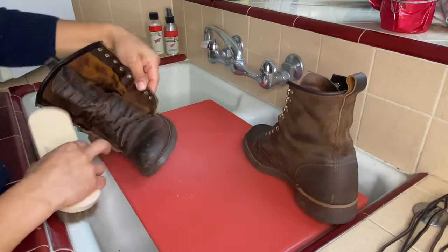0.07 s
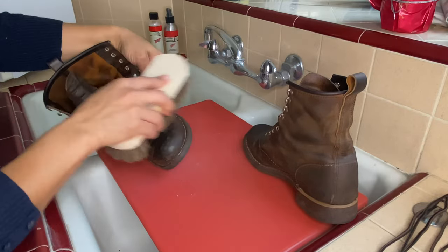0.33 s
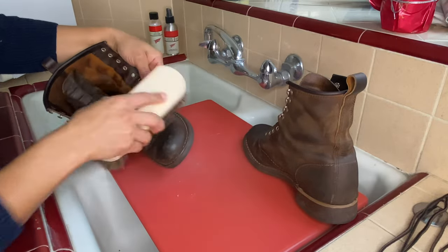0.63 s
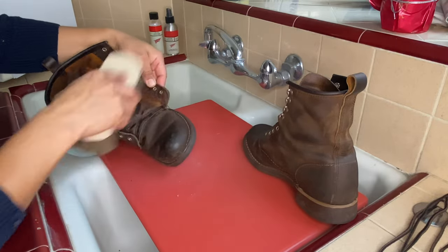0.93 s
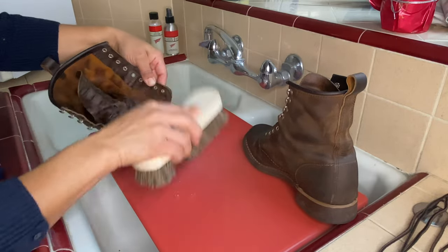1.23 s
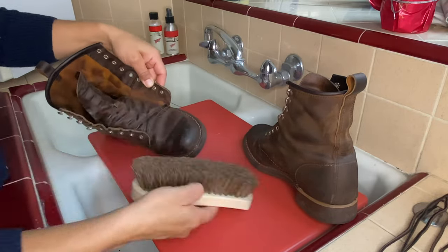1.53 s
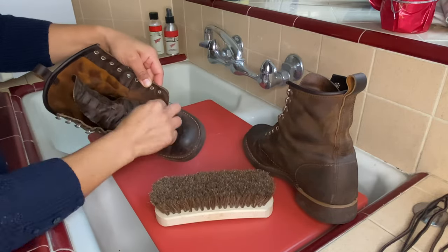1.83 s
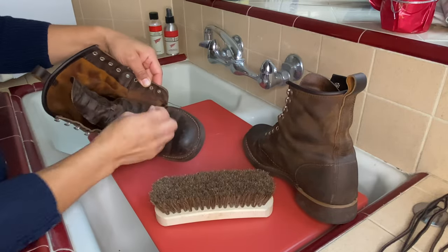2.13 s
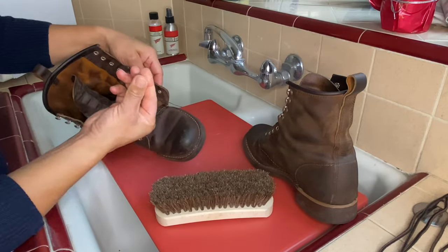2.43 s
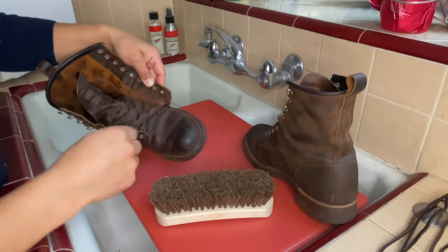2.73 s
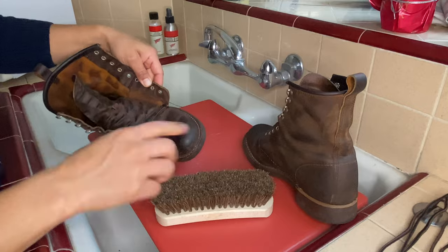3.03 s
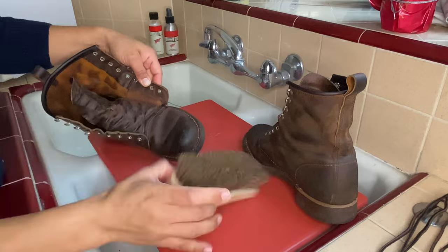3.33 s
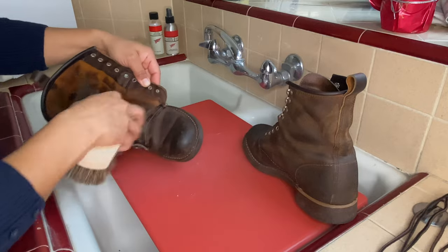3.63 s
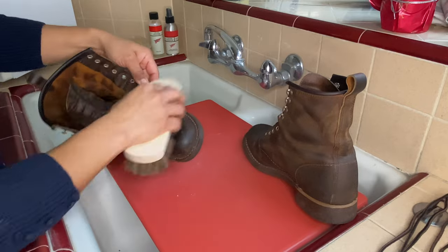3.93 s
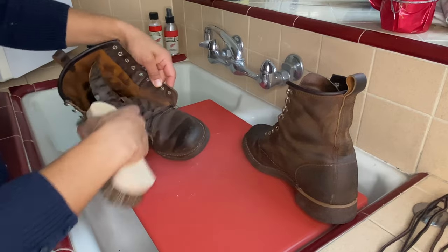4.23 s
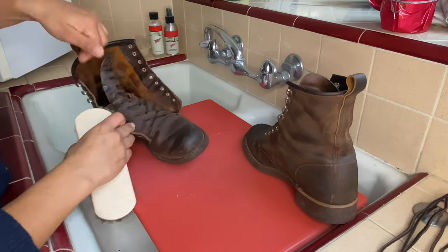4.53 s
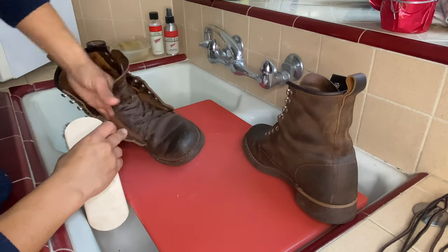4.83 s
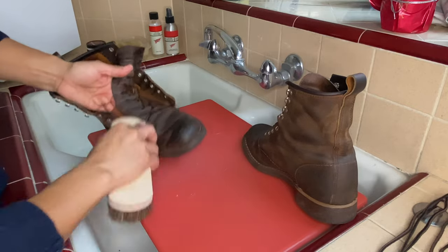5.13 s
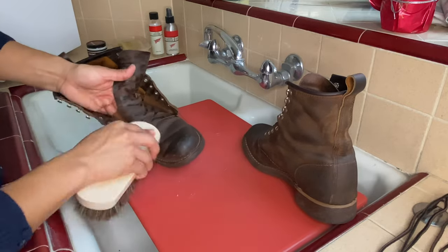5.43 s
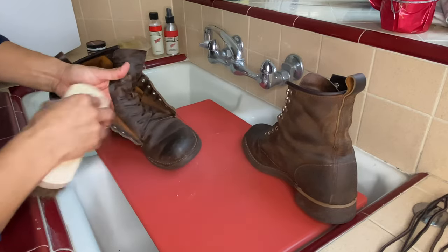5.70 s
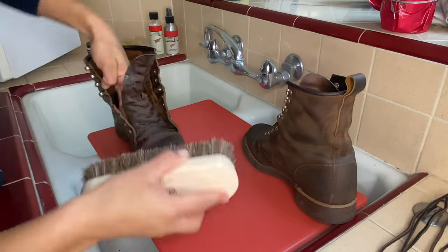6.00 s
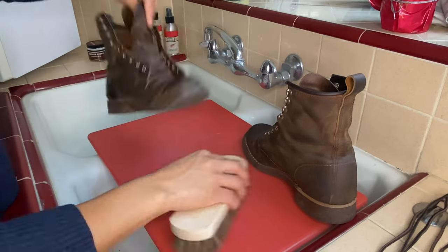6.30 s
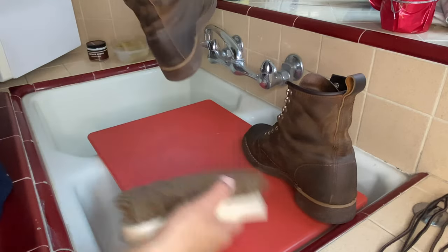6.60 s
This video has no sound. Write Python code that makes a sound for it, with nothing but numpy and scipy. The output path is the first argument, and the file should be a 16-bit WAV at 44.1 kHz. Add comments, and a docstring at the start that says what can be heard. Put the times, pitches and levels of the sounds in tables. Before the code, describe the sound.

A stiff brush sweeps a leather boot in quick, scratchy strokes, with soft hollow thumps from the boot. The wooden brush clatters onto a plastic board, and a quiet pause holds only faint leather rustling. The brush is dragged up with a short judder, and a second, less even run follows with dull knocks, ending in another wooden clatter. It sounds close, in a small tiled room with a low hum.

```python
"""A tiled room, a leather boot lying on a plastic board across a sink. A horsehair brush sweeps the boot in
quick strokes: hairs hiss, tufts rub, the hollow boot thumps; the rocking sole or a light brush tap knocks
on the board. The wooden brush is put down, dragged up in a stick-slip judder for a second run, and dropped
at the end. Leather rustles in the holding hand. The room hums, with a faint high whine."""
import sys
import numpy as np
from scipy import signal
from scipy.fft import rfft, irfft, next_fast_len
from scipy.io import wavfile

SR = 44100
rng = np.random.default_rng(int(sys.argv[2]) if len(sys.argv) > 2 else 0)


def store_pcm(level_fs):
    """Save levels as 16-bit WAV."""
    pcm = np.round(np.clip(level_fs, -1, 1) * 32767).astype(np.int16)
    wavfile.write(sys.argv[1], SR, np.atleast_2d(pcm).T)


N = 298116
TIME_S = np.arange(N) / SR
MAX_RING_T60_S = 0.21
DULL_SLOPES = [0, 0.7, 1.05, 1.3]   # thud, knock, clack, tick [dB per dB of hardness]

# brush strokes on the leather: (time [s], length [s], rise [s], level [dB])
STROKES = [(.203, .052, 0.019, -50), (.382, .15, .035, -56), (.677, 0.06, 0.0046, -49.5),
           (.834, 0.046, 0.0045, -48), (.999, 0.059, 0.018, -51), (1.173, 0.039, 0.0066, -50),
           (1.315, 0.066, 0.0036, -51), (3.573, 0.098, 0.025, -56), (3.774, .071, .01, -52.5),
           (3.944, 0.095, 0.023, -51), (4.235, 0.023, .004, -60), (4.317, 0.072, 0.0018, -68),
           (5.106, 0.049, .004, -56), (5.191, 0.021, 0.012, -47), (5.352, 0.18, 0.0039, -61),
           (5.616, 0.064, 0.0057, -56), (5.816, .055, 0.0055, -56), (5.941, 0.026, 0.0079, -57)]
# dull knocks on board and sink, from the rocking sole or light brush taps:
# (time [s], strength [dB], hardness [dB])
BOARD_KNOCKS = [(0.35, -41, -7.5), (1.621, -22, -21.5), (4.322, -58, 2), (4.49, -41.5, 3.5),
                (4.674, -48, -0.5), (4.918, -49, 4), (4.988, -52.5, -4), (5.179, -31, 10), (5.21, -26, -9),
                (5.225, -34.5, 6.5), (5.351, -33.5, 3.5), (5.421, -32.5, 3.5), (5.954, -34.5, 8),
                (5.989, -32, -31), (6.334, -42, -13.5)]
# hollow boot: (frequency [Hz], gain [dB], uncapped t60 [s])
BOOT_MODES = [(245.6, 5, .18), (293.8, 0, 0.13), (367, -2.5, 0.17), (493, -2, 0.12), (558, -7.5, 0.24),
              (658, -4.5, 0.059), (875, -4.5, .1), (1024, -1.5, 0.07), (1146, -4, 0.1), (1810, -3, 0.079),
              (2138, -6.5, .06), (2177, -6, 0.094)]
# wooden brush back on the board: (frequency [Hz], gain [dB], uncapped t60 [s])
WOOD_MODES = [(258, 7.5, 0.1), (321, 5.5, 0.12), (375.2, 5.5, 0.48), (516.2, 7.5, 0.15), (575.3, 7.5, 0.12),
              (644, 0.5, 0.085), (689, -5.5, .2), (953, -8.5, 0.19), (1018, -1, .06), (1330, -3, .08),
              (1497, 0, 0.065), (1723, -8.5, 0.091), (2172, -7, 0.18), (2432, -1.5, 0.12),
              (2550, -7, 0.087), (3064, -7, 0.12), (1150, -9, 0.028), (2520, -4.5, 0.097),
              (4310, -1.5, 0.088), (5370, -1.5, 0.059), (6370, -3.5, 0.055)]
# leather moving in the holding hand: (time [s], level [dB])
HANDLING = [(0, -69), (1.5, -84.5), (1.9, -64.5), (2.3, -84.5), (3.1, -83.5), (3.45, -72), (3.8, -85),
            (4.5, -60.5), (5.1, -59.5), (6.05, -59), (6.76, -69)]
# left-right likeness: (frequency [Hz], unclipped coherence [ratio])
COHERENCE = [(60, 0.8), (250, 1.27), (550, 0.62), (1200, 0.49), (3000, 0.03), (12000, 0.1)]


def bristles(flick_db=0.5, tuft_db=2.5, hiss_db=3.5, rub_db=-5.0, boot_db=-3.5):
    """Single hairs flick (hiss); whole tufts catch on the leather (rub) and keep the boot ringing."""
    # hair and tuft spectra: (frequency [Hz], density [dB])
    hiss_spectrum = [(200, -1.5), (700, 0), (1500, -3), (3000, 1.5), (4500, 4), (7000, -1), (10000, 1),
                     (12000, -4), (15000, -5.5)]
    rub_spectrum = [(150, -28.5), (250, 10.5), (400, -0.5), (700, -2.5), (1100, 3.5), (1600, -3.5),
                    (2300, -9), (3200, -10), (5000, -20), (9000, -37.5)]
    # rub resonances: (frequency [Hz], width [Hz], gain [dB])
    rub_peaks = [(263, 16, -2.5), (1030, 130, 7), (1160, 17, 9.5), (1310, 27, -0.5), (1536, 60, 1.5),
                 (1710, 78, 1), (2034, 90, -1.5), (2380, 68, 4)]
    hiss_env, rub_env = friction_envelopes()
    tufts = from_db(tuft_db * flutter(rate_hz=59))
    hairs = stereo_noise() * from_db(flick_db * flutter(rate_hz=1500))
    friction = stereo_noise() * tufts
    hiss = from_db(hiss_db) * hiss_env * shaped(hairs * np.sqrt(tufts), hiss_spectrum)
    rub = from_db(rub_db) * rub_env * shaped(friction, rub_spectrum)
    peaks = sum(from_db(db) * signal.lfilter(*signal.iirpeak(hz, hz / width_hz, fs=SR), rub)
                for hz, width_hz, db in rub_peaks)
    drive = from_db(rub_db) * rub_env * friction.mean(axis=0)
    boot = sum(from_db(db) * ring(drive, hz, t60_s) / np.sqrt(t60_s * SR) for hz, db, t60_s in BOOT_MODES)
    return hiss + rub + peaks + from_db(boot_db) * boot


def friction_envelopes(hiss_fade_s=0.025, rub_fade_s=0.016, grip_db=10.5, finger_rise_s=0.018):
    """Hiss and rub amplitudes: strokes give both, grazes only hiss, fingers mostly rub."""
    # bristles grazing board or hand: (time [s], length [s], rise [s], level [dB])
    grazes = [(1.46, 0.19, 0.072, -70), (3.222, 0.022, 0.012, -52), (3.305, 0.044, 0.054, -46.5),
              (3.428, 0.12, 0.0055, -73), (6.321, .14, 0.012, -56)]
    # fingers on the leather: (time [s], length [s], level [dB])
    finger_rubs = [(0.052, 0.038, -57), (2.018, 0.14, -66.5), (4.675, 0.063, -50), (4.776, 0.039, -47),
                   (4.862, .045, -50), (6.226, 0.033, -59.5)]
    fingers = pressure([(s, length_s, finger_rise_s, db) for s, length_s, db in finger_rubs], rub_fade_s)
    hiss = pressure(STROKES + grazes, hiss_fade_s) + from_db(-16) * fingers
    rub = from_db(grip_db) * pressure(STROKES, rub_fade_s) + fingers
    return hiss, rub


def pressure(contacts, fade_s, even_rise_s=0.018, db_per_doubling=3.5):
    """A contact that lands fast loses pressure, one eased on gains it; each fades as it lifts."""
    out = np.zeros(N)
    for start_s, length_s, rise_s, level_db in contacts:
        span = slice(int(start_s * SR), int(start_s * SR) + SR // 2)
        t = TIME_S[span] - start_s
        change_db = db_per_doubling * np.log2(rise_s / even_rise_s)
        held = from_db(level_db + change_db * (np.clip(t / length_s, 0, 1) - .5))
        out[span] += np.clip(t / rise_s, 0, 1) * held * np.exp(-np.maximum(t - length_s, 0) / fade_s)
    return out


def seam_catches(per_stroke=2, gain_db=1.5, scatter_db=11.5):
    """Tufts catch on seams at random moments, more strongly in a firmer stroke."""
    start_s, length_s, rise_s, level_db = np.repeat(STROKES, per_stroke, axis=0).T
    when, size = rng.random((len(start_s), 2)).T
    times_s = start_s + rise_s + when * (length_s - rise_s)
    strength_db = level_db + gain_db + scatter_db * (size - .5)
    return [(s, db, 0) for s, db in zip(times_s, strength_db)]


def boot_thumps(bands):
    """The brush lands, flicks an eyelet or catches a seam; the hollow boot rings."""
    # (time [s], strength [dB], hardness [dB])
    hits = [(.229, -40, 0), (.687, -41, -7), (.49, -40.5, -3.5), (.528, -39, 4.5), (.734, -35, 8.5),
            (.842, -34, 3.5), (.892, -34, 6), (1.040, -31.5, 0.5), (1.225, -40.5, 0), (1.261, -17.5, -2.5),
            (1.436, -42, -21), (1.792, -53, 12), (2.094, -59.5, 13.5), (3.671, -45.5, -10),
            (3.789, -38, 3.5), (3.821, -38, 5), (3.837, -36, 6.5), (4.005, -47.5, 2), (4.021, -37.5, 6),
            (4.727, -34, -25), (4.839, -55, 20.5), (5.038, -51, -7), (5.626, -40, -9), (5.829, -34, 4)]
    # offsets from strength: (thud [dB], knock [dB], clack [dB], tick [dB])
    voice_db = [-0.5, -5, -4, -25.5]
    blows = voiced(hits + seam_catches(), voice_db, DULL_SLOPES)
    return impacts(blows, BOOT_MODES, bands, ring_db=-2, crack_db=-0.5, crack_t60_s=0.045, tail_db=-7)


def board_knocks(bands):
    """Board and sink knock dully under the rocking sole or a light tap of the brush."""
    # (frequency [Hz], gain [dB], t60 [s])
    modes = [(135, -10.5, 0.082), (248, 6, 0.18), (306.1, 0, 0.21), (352, 6, 0.13), (483, -3, 0.044),
             (558.6, 2.5, 0.064), (654, -2, 0.11), (723, -13.5, 0.13), (942.6, 13, 0.057), (1150, -2, 0.09),
             (2210, -9.5, 0.21)]
    # offsets from strength: (thud [dB], knock [dB], clack [dB], tick [dB])
    voice_db = [-1.5, 1, -6.5, -22]
    blows = voiced(BOARD_KNOCKS, voice_db, DULL_SLOPES)
    return impacts(blows, modes, bands, ring_db=-0.5, crack_db=-1.5, crack_t60_s=0.05, tail_db=-5.5)


def brush_clacks(bands):
    """The wooden back hits, bounces on or taps the board."""
    # (time [s], strength [dB], hardness [dB])
    hits = [(1.551, -23.5, -1.5), (1.598, -23, 6), (1.62, -34, 14.5), (1.65, -31, 5), (1.691, -30.5, -16.5),
            (6.253, -50, -17), (6.35, -45.5, -10), (6.48, -41.5, -14), (6.69, -49.5, -14),
            (6.709, -36.5, -8), (6.731, -19, -1), (6.747, -20, 8)]
    # offsets from strength: (thud [dB], knock [dB], clack [dB], tick [dB])
    voice_db = [-14.5, 0.5, 0, -10.5]
    blows = voiced(hits, voice_db, slopes=[-0.55, 0.19, 1.05, 0.96])
    return impacts(blows, WOOD_MODES, bands, ring_db=-2, crack_db=1, crack_t60_s=0.017, tail_db=-4)


def brush_drag(bands, start_s=3.172, end_s=3.39, slips_per_s=160, fall_db_per_s=397):
    """Wood sticks and slips on plastic: an uneven run of tiny blows, peaking at each shove."""
    # (peak time [s], slip strength [dB])
    shoves = [(3.193, -45.5), (3.238, -31.5), (3.328, -32.5)]
    peak_s, peak_db = np.transpose(shoves)
    gap_jitter, level_jitter = rng.standard_normal((80, 2)).T
    elapsed_s = np.cumsum(np.exp(0.41 * gap_jitter)) / slips_per_s
    slip_s = start_s + elapsed_s
    shove_db = np.max(peak_db - fall_db_per_s * np.abs(slip_s[:, None] - peak_s), axis=1)
    knock_db = shove_db - 3.5 * level_jitter
    treble_db = knock_db - 9.5 + 99 * elapsed_s   # brightens as the brush tips onto its edge
    blows = np.column_stack([slip_s, knock_db - 16.5, knock_db, treble_db - 8, treble_db - 13.5])
    return impacts(blows[slip_s < end_s], WOOD_MODES, bands, ring_db=-7, crack_db=-14, crack_t60_s=0.03,
                   tail_db=-7, tail_t60_s=0.098, contact_s=0.0019)


def voiced(hits, voice_db, slopes):
    """Harder is brighter. Returns (time [s], thud [dB], knock [dB], clack [dB], tick [dB])."""
    times_s, strength_db, hardness_db = np.transpose(hits)
    return np.column_stack([times_s, strength_db[:, None] + voice_db + np.outer(hardness_db, slopes)])


def impacts(blows, modes, bands, ring_db, crack_db, crack_t60_s, tail_db, tail_t60_s=0.16, contact_s=0.002):
    """Each blow rings the modes and sets off a crack with a tail in the sink, shorter in the treble."""
    # register centres: (thud [Hz], knock [Hz], clack [Hz], tick [Hz])
    registers_hz = [270, 620, 1600, 5000]
    # crack per half octave, relative to the blow: (frequency [Hz], level [dB])
    crack_spectrum = [(50, -27), (90, -20.5), (160, -18.5), (270, -3.5), (420, -7.5), (700, 1.5),
                      (1100, -5.5), (2300, -1), (3300, -0.5), (4700, 4.5), (6500, -9), (9000, -7.5),
                      (14000, -10.5)]
    _, knock_hz, clack_hz, tick_hz = registers_hz
    softness_db = np.minimum(blows[:, -1] - blows[:, -2], 0)

    def clicks(hz, gain, delay_s):
        weights = [np.interp(np.log(hz), np.log(registers_hz), unit) for unit in np.eye(4)]
        rolloff_db = 0.22 * softness_db * max(np.log2(hz / tick_hz), 0)
        buildup_s = contact_s / (1 + (hz / knock_hz) ** 2)   # bass builds over the contact
        at = np.clip(((blows[:, 0] + buildup_s + delay_s) * SR).astype(int), 0, N - 1)
        return np.bincount(at, gain * from_db(blows[:, 1:] @ weights + rolloff_db), N)

    out = np.zeros((2, N))
    for k, (hz, db, t60_s) in enumerate(modes):
        gain = (-1) ** k * from_db(ring_db + db + rng.normal(0, 1, len(blows)))   # strike spot varies
        skew_s = np.arccos(np.clip(at_hz(COHERENCE, hz), 0, 1)) / (2 * np.pi * hz)
        for side in range(2):
            out[side] += ring(clicks(hz, gain, skew_s * ((k + side) % 2)), hz, t60_s)
    for hz, noise in bands:
        force = clicks(hz, from_db(at_hz(crack_spectrum, hz)), 0)
        t60_scale = (clack_hz / hz) ** .25
        crack = burst_energy(from_db(crack_db) * force, crack_t60_s * t60_scale)
        tail = burst_energy(from_db(tail_db) * force, tail_t60_s * t60_scale)
        out += noise * np.sqrt(crack + tail)
    return out


def leather_rustle(crinkle_db=3.5):
    """Leather crinkles in the holding hand."""
    # (frequency [Hz], density [dB])
    spectrum = [(120, -2.5), (280, 15.5), (600, 0), (1400, -3.5), (3000, -8.5), (4500, -5.5), (7500, -12.5),
                (15000, -19)]
    crinkle = stereo_noise() * from_db(crinkle_db * flutter(rate_hz=40))
    return envelope(HANDLING) * shaped(crinkle, spectrum)


def board_rumble(centre_hz=116, shift_s=2.32, shift_width_s=0.04, shift_db=-50.5):
    """The board rumbles after dull knocks, under strokes and hand, and as the boot shifts once."""
    times_s, strength_db, _ = np.transpose(BOARD_KNOCKS)
    knock_energy = burst_energy(impulses(times_s, strength_db - 16), t60_s=0.5)
    pressed = from_db(-6.5) * pressure(STROKES, fade_s=0.15)
    shifted = from_db(shift_db) / (1 + ((TIME_S - shift_s) / shift_width_s) ** 2)
    held = from_db(-2.5) * envelope(HANDLING)
    noise = unit_rms(bandpass(stereo_noise(), centre_hz / 1.2, centre_hz * 1.29))
    return noise * np.sqrt(knock_energy + pressed ** 2 + shifted ** 2 + held ** 2)


def nail_picks():
    """Fingernails tick on the leather."""
    # (time [s], level [dB])
    picks = [(2.972, -65), (3.017, -64), (6.241, -53)]
    return np.sqrt(burst_energy(impulses(*np.transpose(picks)), t60_s=0.086)) * stereo_noise()


def tiled_room(x, t60_s=0.57, wet_db=-28, dull_hz=3000):
    """Adds the diffuse tail off the tiles, different on each side."""
    t = TIME_S[:SR]
    tail = rng.standard_normal((2, SR)) * from_db(-60 * t / t60_s) * np.clip(t / .02, 0, 1)
    tail /= np.sqrt(np.sum(tail ** 2) / 2)
    tail = bandpass(tail, 250, dull_hz, order=1)
    return x + from_db(wet_db) * signal.fftconvolve(x, tail, axes=1)[:, :N]


def room_hum(level_db=-66.5):
    """Steady low room noise."""
    # (frequency [Hz], density [dB])
    spectrum = [(25, -32), (55, -24.5), (85, -2.5), (115, -2.5), (160, -12.5), (280, -19), (400, -18),
                (550, -29), (1000, -31.5), (2000, -39), (3500, -38), (5000, -34.5), (8000, -43),
                (15000, -44)]
    return from_db(level_db) * shaped(stereo_noise(), spectrum)


def whine(swell_above_hz=1600):
    """Thin, wavering lines of narrowband noise; the upper ones swell."""
    # (frequency [Hz], level [dB], width [Hz])
    lines = [(228, -81.5, 2.8), (385, -83, 4.3), (500, -87, 2.7), (2476, -88.5, 66), (4000, -91.5, 20),
             (5270, -99, 8), (5327, -84.5, 17), (6207, -103, 25)]
    # (time [s], gain [dB])
    swell = [(0, -10), (1.9, 3), (2.6, 0), (3.6, 9.5), (4.2, 11), (4.6, 15), (5.2, 15), (6.2, 15),
             (6.7, -6)]
    noise, out = stereo_noise(), np.zeros((2, N))
    for line_hz, db, width_hz in lines:
        line = unit_rms(filtered(noise, lambda hz: 1 / (1 + (2 * (hz - line_hz) / width_hz) ** 2)))
        out += from_db(db) * line * (envelope(swell) if line_hz > swell_above_hz else 1)
    return out


def from_db(db):
    return 10 ** (np.asarray(db) / 20)


def unit_rms(x):
    return x / np.sqrt(np.mean(x ** 2) + 1e-20)


def envelope(points):
    return from_db(np.interp(TIME_S, *np.transpose(points)))


def impulses(times_s, levels_db):
    return np.bincount((times_s * SR).astype(int), from_db(levels_db), N)


def at_hz(points, hz):
    """Table lookup on a log-frequency axis."""
    knots_hz, values = np.transpose(points)
    return np.interp(np.log(np.maximum(hz, 1)), np.log(knots_hz), values)


def bandpass(x, low_hz, high_hz, order=2):
    return signal.sosfilt(signal.butter(order, [low_hz, high_hz], "band", fs=SR, output="sos"), x)


def filtered(x, response):
    """FFT filter with gain response(hz)."""
    size = next_fast_len(N + SR // 10, real=True)
    hz = np.arange(size // 2 + 1) * SR / size
    return irfft(rfft(x, size) * response(hz), size)[..., :N]


def shaped(x, spectrum):
    """Imposes a spectrum; rms 1."""
    return unit_rms(filtered(x, lambda hz: from_db(at_hz(spectrum, hz))))


def stereo_noise():
    """White noise, coherent in the bass and less so in the treble."""
    def mid_side_gains(hz):
        return np.sqrt(1 + np.outer([1, -1], np.clip(at_hz(COHERENCE, hz), 0, .995)))

    mid, side = filtered(rng.standard_normal((2, N)), mid_side_gains)
    return unit_rms(np.array([mid + side, mid - side]))


def noise_bands():
    """Half-octave stereo bands: (centre [Hz], noise of rms 1)."""
    white = [stereo_noise(), stereo_noise()]
    return [(hz, unit_rms(bandpass(white[k % 2], hz / 2 ** .25, hz * 2 ** .25)))
            for k, hz in enumerate(54 * 2 ** (np.arange(17) / 2))]


def flutter(rate_hz):
    """Random wavering up to about rate_hz; rms 1."""
    return unit_rms(filtered(rng.standard_normal(N), lambda hz: 1 / (1 + (hz / rate_hz) ** 2)))


def ring(drive, hz, t60_s):
    """One damped mode, its t60 capped; a unit click rings at height 1."""
    radius = from_db(-60 / (min(t60_s, MAX_RING_T60_S) * SR))
    angle = 2 * np.pi * hz / SR
    return signal.lfilter([0, np.sin(angle)], [1, -2 * radius * np.cos(angle), radius ** 2], drive + 1e-18)


def burst_energy(clicks, t60_s):
    """Summed energy of decaying bursts."""
    return signal.lfilter([1], [1, -from_db(-120 / (t60_s * SR))], clicks ** 2 + 1e-24)


def from_left(x, lag_s=0.00043):
    """Above the bass, sound reaches the right microphone later."""
    right = filtered(x[1], lambda hz: np.exp(-2j * np.pi * hz * lag_s * np.clip(hz / 400 - 1, 0, 1)))
    return np.array([x[0], right])


def scene():
    """Boot to the left, brush put down slightly to the right, both in the room."""
    bands = noise_bands()
    brushing = bristles() + boot_thumps(bands) + board_knocks(bands)
    wood = (brush_clacks(bands) + brush_drag(bands)) * from_db([[-1], [1]])
    handling = leather_rustle() + board_rumble() + nail_picks()
    return tiled_room(from_left(brushing + handling) + wood) + room_hum() + whine()


def record(dry, low_cut_hz=80, high_cut_hz=15400):
    """Each microphone has its own colour; deep bass and top are cut."""
    # (frequency [Hz], left minus right [dB])
    balance = [(60, -0.5), (200, -1.5), (400, -4.5), (650, -4), (950, -2), (1300, 4), (2400, 0.5),
               (4500, 0.5), (8000, 2.5), (15000, 2)]
    heard = filtered(dry, lambda hz: from_db(np.outer([.5, -.5], at_hz(balance, hz))))
    heard = signal.sosfilt(signal.butter(3, low_cut_hz, "high", fs=SR, output="sos"), heard)
    return signal.sosfilt(signal.ellip(10, .1, 80, high_cut_hz, fs=SR, output="sos"), heard)


dry = scene()
out = record(dry)
store_pcm(out)
```